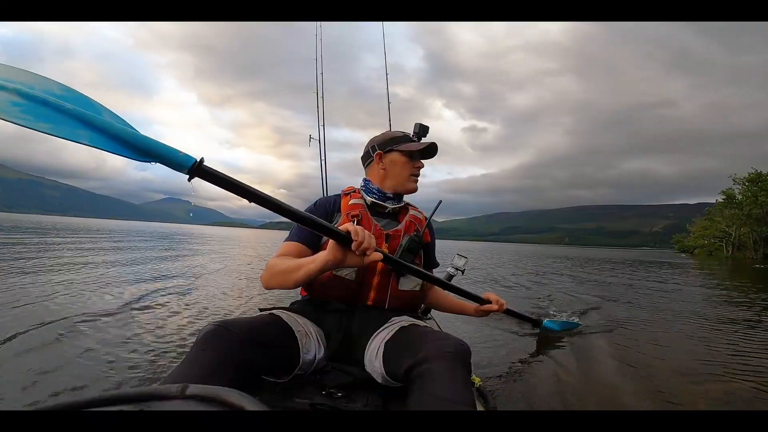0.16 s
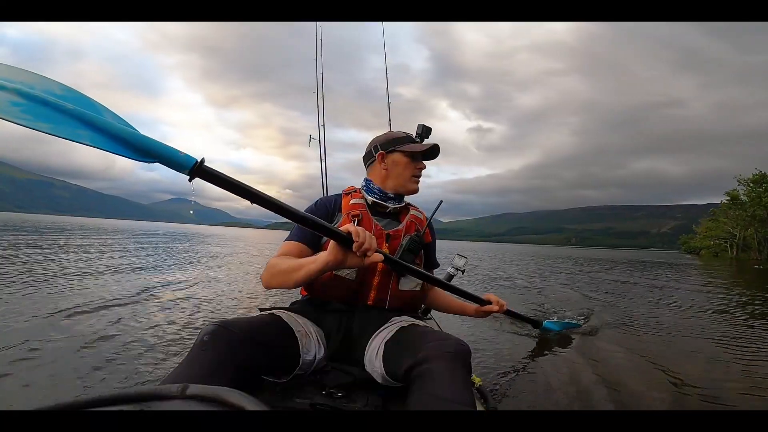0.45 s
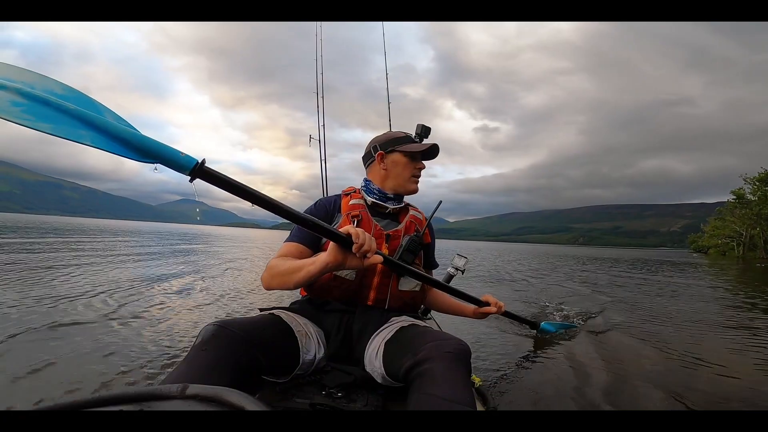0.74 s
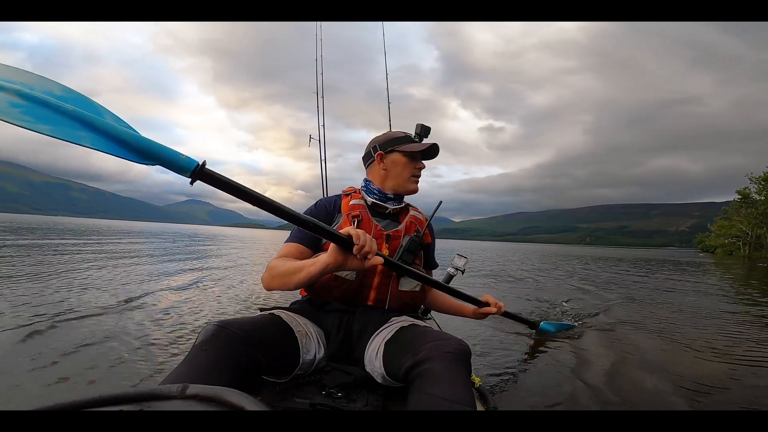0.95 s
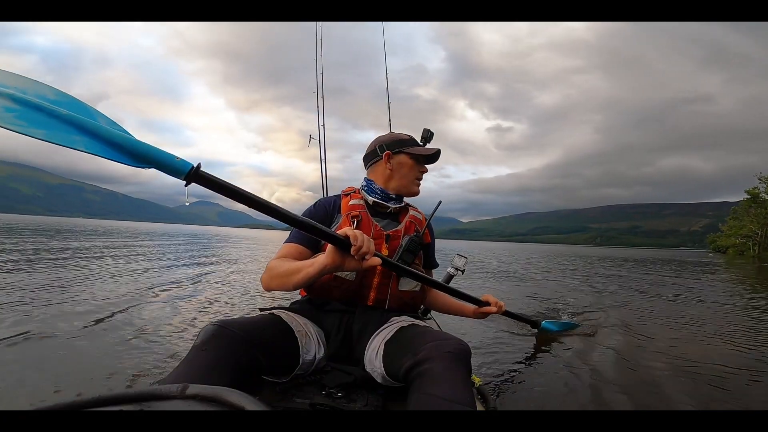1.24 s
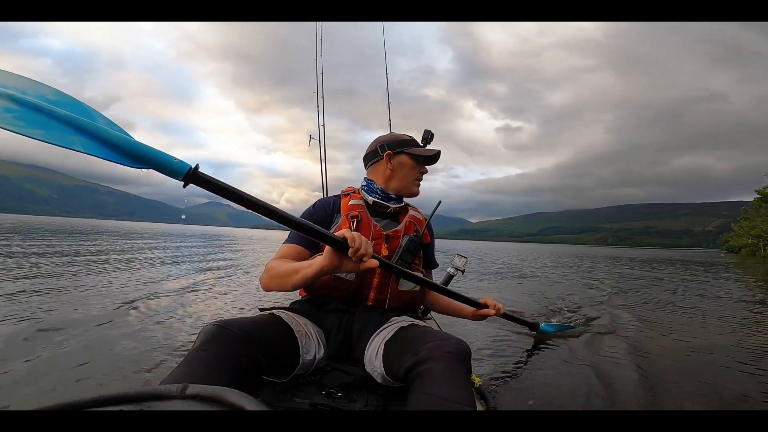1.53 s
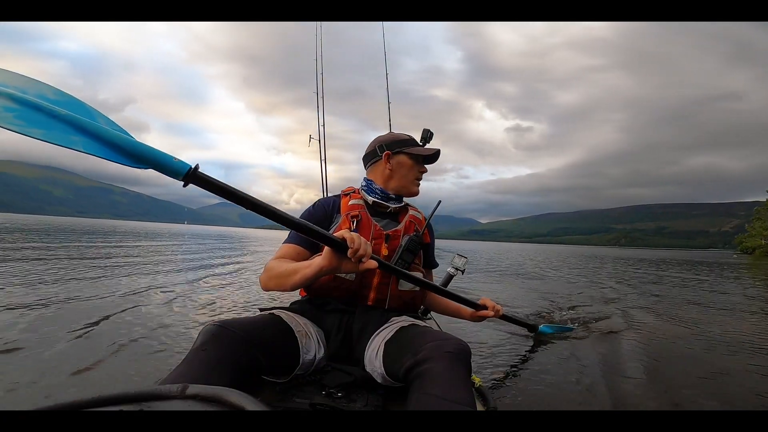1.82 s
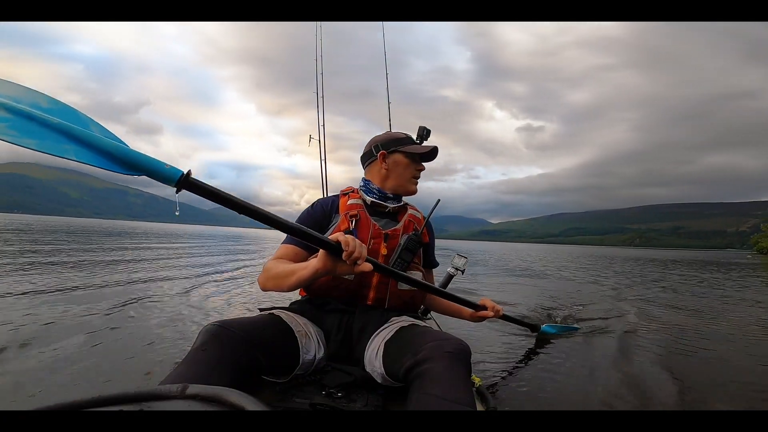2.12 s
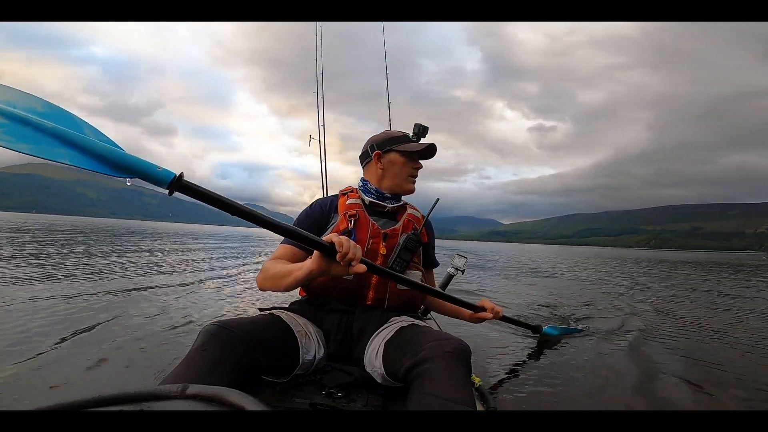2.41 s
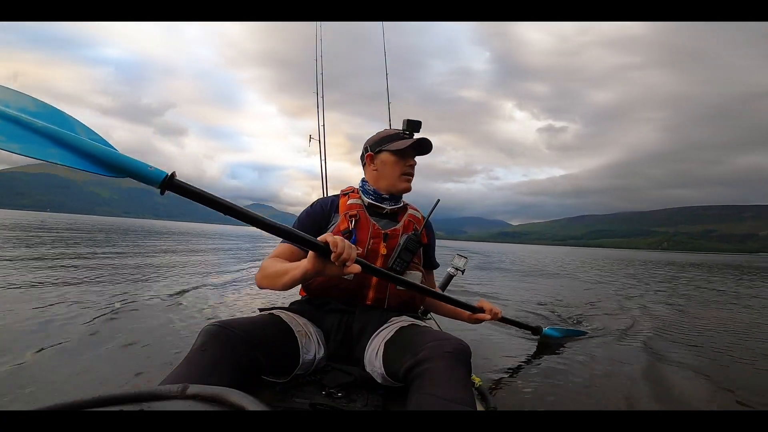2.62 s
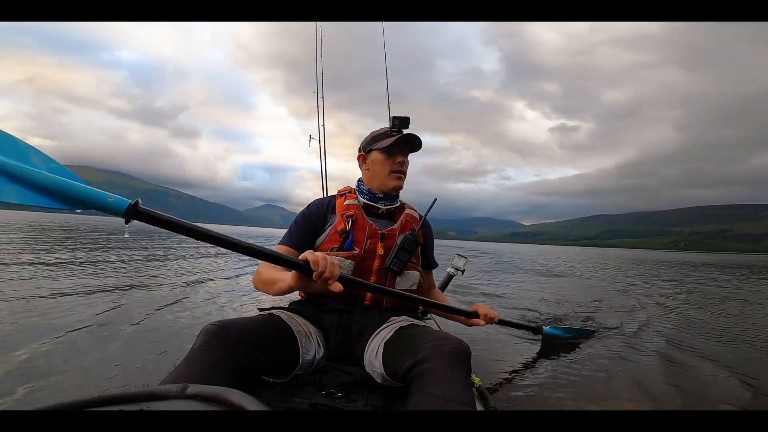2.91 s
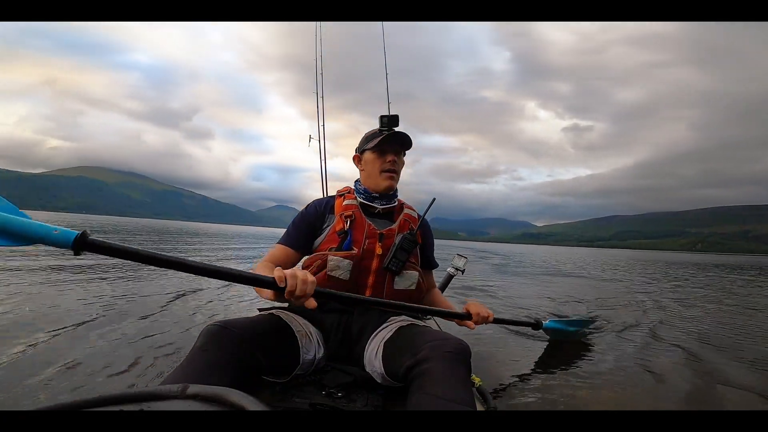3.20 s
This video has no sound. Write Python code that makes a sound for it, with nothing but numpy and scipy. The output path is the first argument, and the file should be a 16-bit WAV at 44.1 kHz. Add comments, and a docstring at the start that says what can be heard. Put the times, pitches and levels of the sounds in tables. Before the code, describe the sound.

Water gurgles, trickles and splashes softly around a paddle blade dragging beside a kayak for the first two seconds. Wind buffets the microphone from about 0.6 seconds, with low thuds strongest near 0.8 to 0.9 seconds. A clear plop comes at 1.9 seconds. Then the wind eases and the water thins to quiet single drips until about 3.3 seconds, with very faint lapping behind.

```python
"""A paddle blade drags beside a kayak drifting on a lake.
Water gurgles and splashes round the blade and slows to single drips: noise bands for wash and spray,
rising, dying sines for bubbles, a few low cycles for plops.
Gusts buffet the microphone with a thud, a flutter and one low bump; faint lapping lies far behind."""
import sys
import numpy as np
from scipy import signal
from scipy.io import wavfile

SR = 44100
rng = np.random.default_rng(int(sys.argv[2]) if len(sys.argv) > 2 else 0)


def to_wav(s):
    """Save 16-bit WAV."""
    ch = np.atleast_2d(s).T  # columns
    pcm = np.round(np.clip(ch, -1, 1) * 32767)  # PCM
    wavfile.write(sys.argv[1], SR, pcm.astype(np.int16))


N = 147735

# churn round the blade: (time [s], wash level [dB], spray level [dB])
CHURN = [(0.0, -48.5, -71.5), (0.21, -50, -63.5), (0.29, -43.5, -63.5), (0.47, -56.5, -70.5),
         (0.66, -50, -67), (0.82, -45, -65.5), (1.07, -53, -67.5), (1.39, -56, -74), (1.6, -51.5, -67.5),
         (1.74, -55.5, -63.5), (1.83, -51, -70.5), (1.95, -53, -73.5), (2.02, -59.5, -72),
         (2.23, -58.5, -76), (2.35, -71.5, -73.5), (2.51, -63, -81.5), (2.64, -78, -77),
         (2.84, -69.5, -84.5), (3.11, -72, -82), (3.35, -63, -76.5)]


def amp(db):
    return 10 ** (np.asarray(db) / 20)


def unit_rms(x):
    return x / np.sqrt(np.mean(x ** 2) + 1e-20)


def envelopes(rows):
    """Per-sample curve of each column after the time."""
    time_s, *columns = np.transpose(rows)
    return [np.interp(np.arange(N) / SR, time_s, c) for c in columns]


def level_at(spectrum, hz):
    freq_hz, db = np.transpose(spectrum)
    return np.interp(np.log(hz), np.log(freq_hz), db)


def bandpass(x, low_hz, high_hz):
    return signal.sosfilt(signal.butter(2, [low_hz, high_hz], "band", fs=SR, output="sos"), x)


def drift(rate_hz):
    """Slow random wander, rms about 1."""
    hop = 40
    pole = np.exp(-2 * np.pi * rate_hz * hop / SR)
    slow = signal.lfilter([1], [1, -2 * pole, pole ** 2], rng.standard_normal(N // hop + 2002))[2000:]
    return np.interp(np.arange(N) / hop, np.arange(len(slow)), unit_rms(slow))


def flicker_noise(spectrum, depth_db, rate_hz, shared):
    """Half-octave noise bands, each with its own flicker plus a shared one; rms 1."""
    out, common = 0, drift(rate_hz)
    octaves = np.log2(spectrum[-1][0] / spectrum[0][0])
    edges_hz = spectrum[0][0] * 2 ** np.arange(0, octaves + .01, .5)
    white = rng.standard_normal((2, N + SR // 4))
    for k, (low, high) in enumerate(zip(edges_hz, edges_hz[1:])):
        band = bandpass(white[k % 2], low, high)[-N:]
        flicker_db = depth_db * (shared * common + drift(rate_hz))
        out = out + band * amp(level_at(spectrum, np.sqrt(low * high)) + flicker_db)
    return unit_rms(out)


def bubble_tone(hz, cycles, draw):
    """Ragged dying sine; the pitch climbs as the bubble nears the surface."""
    life_s = np.clip(cycles, 3, 70) / hz
    t = np.arange(int(life_s * SR)) / SR
    rough, wobble = (np.interp(t * hz / 4, np.arange(20), d) for d in (draw[:20], draw[20:]))
    glide = 1 + .1854 * np.sqrt(1000 / hz) * t / life_s + .059 * wobble
    tone = np.sin(2 * np.pi * hz * np.cumsum(glide) / SR)
    attack = 1 - np.exp(-t * hz / 1.14)
    decay = amp(-25.1 * (t / life_s) ** .57)
    return attack * decay * tone * (1 + .43 * min(cycles / 20, 1) * rough)


def bubble_slap(hz, draw, decay_s=.0015):
    """Opening noise burst, centred just above the bubble's pitch; peak 1."""
    t = np.arange(300) / SR
    a, b = (np.interp(.9 * hz * t, np.arange(150), d) for d in (draw[:150], draw[150:]))
    phase = 2 * np.pi * 1.15 * hz * t
    envelope = np.minimum(hz * t, 1) * np.exp(-t / decay_s) * np.hanning(600)[300:]
    slap = envelope * (a * np.sin(phase) + b * np.cos(phase))
    return slap / np.abs(slap).max()


def bubbles(rows):
    """One slap and ringing tone per row."""
    out = np.zeros(N + SR)
    for time_s, db, hz, cycles, slap_db in rows:
        draw = rng.standard_normal(340)
        tone, slap = bubble_tone(hz, cycles, draw[:40]), bubble_slap(hz, draw[40:])
        i = int(time_s * SR)
        out[i:i + len(tone)] += amp(db) * tone
        out[i:i + len(slap)] += amp(db + slap_db) * slap
    return out[:N]


def swarm(spectrum, per_s, low_hz, high_hz, cycles, spread_db, clump_db, slap_db):
    """Small bubbles born at random, in clumps; rms 1."""
    when, pitch, strength, ring, softness = rng.random((1500, 5))[:int(per_s * N / SR)].T
    births = np.cumsum(amp(clump_db * drift(9)))
    time_s = np.searchsorted(births / births[-1], when) / SR
    hz = low_hz * (high_hz / low_hz) ** pitch
    db = level_at(spectrum, hz) + 10 * np.log10(hz) - spread_db * np.log(strength + .012)
    return unit_rms(bubbles(zip(time_s, db, hz, cycles * (.5 + ring), slap_db - 15 * softness)))


def drips():
    """Distinct drips and bubbles ringing above the churn."""
    # (time [s], level [dB], pitch [Hz], life [cycles], slap re level [dB])
    events = [(0.034, -28, 1075, 13.6, -22), (0.238, -26, 1005, 29, -3), (0.255, -33, 924, 38, -19),
              (0.267, -29, 1700, 16, -7), (0.293, -28.5, 880, 16, -10), (0.327, -29, 1330, 14, -9),
              (0.385, -37.5, 970, 23, -13), (0.419, -36.5, 1720, 37, -1), (0.466, -37.5, 1050, 33, 2),
              (0.705, -33, 1210, 56, -6.5), (0.808, -35, 1007, 37, 0), (0.934, -30.5, 970, 41, -13),
              (1.108, -42, 1260, 32, -16), (1.127, -38, 1214, 30, -13), (1.228, -29, 1020, 25, -3.5),
              (1.352, -41, 748, 65, 4), (1.364, -33, 950, 37, -7), (1.571, -31.5, 1374, 23, -12),
              (1.629, -34, 1490, 29, -7), (1.659, -37.5, 890, 38, 0), (1.827, -34.5, 900, 17, 1.5),
              (1.834, -29, 1316, 25, -14), (1.844, -41, 743, 36, -1), (1.898, -38, 930, 39, -20),
              (1.912, -19.5, 1187, 23.6, -13), (1.9125, -27.5, 550, 7.3, -4), (1.92, -24, 1313, 21, -22),
              (1.979, -34, 717, 27.5, -30), (2.296, -41, 1040, 59, -16), (2.337, -38.5, 1105, 37, -2.5),
              (2.376, -41, 970, 43, -16), (2.54, -44.5, 1670, 38, -25), (2.607, -42.5, 953, 31, 1),
              (2.981, -43.5, 850, 47, -31), (2.997, -39, 1190, 13, -24), (3.052, -40, 1230, 26, -8),
              (2.3765, -42, 1440, 45, -11), (2.6085, -41.5, 1400, 45, -1), (2.9811, -37, 1500, 14, -37),
              (0.0074, -36.5, 2330, 32, -18), (0.0318, -45, 2660, 24, -32), (0.159, -39.5, 2140, 28, -4),
              (0.2703, -47, 2210, 42, -23), (0.3865, -41, 2570, 56, -12), (0.6998, -33, 1890, 28, -4),
              (0.7173, -32.5, 2520, 65, -2), (0.9213, -34, 2310, 28, 4.5), (1.1323, -36.5, 2300, 37, -11),
              (1.2695, -41, 2270, 63, -3), (1.3024, -38, 2260, 47, -6), (1.4082, -45, 2720, 41, -18),
              (1.712, -54, 2980, 16, -6), (1.732, -33, 2350, 23, -1), (2.103, -47.5, 1990, 32, -6),
              (2.2553, -45, 2330, 33, -0.5), (2.377, -33.5, 2280, 32, -18), (2.4613, -46.5, 2270, 43, -23),
              (2.584, -51.5, 2700, 43, 0), (3.2884, -50.5, 2460, 40, -12), (3.3174, -52.5, 2320, 24, -3),
              (0.2064, -42.5, 3270, 25, -5), (0.3461, -39, 2810, 17, -2), (0.411, -48, 2740, 75, -11),
              (0.4868, -39.5, 2650, 34, -1.5), (0.5387, -48, 2690, 33, -14), (0.7776, -29.5, 3550, 41, -12),
              (0.8445, -35.5, 3330, 24, -7.5), (0.8734, -43, 3890, 47, -5), (1.3274, -43.5, 3620, 47, -12),
              (1.5614, -40.5, 3540, 54, -5), (1.7509, -36.5, 3940, 28, -3), (1.8103, -43.5, 2920, 21, -5),
              (1.8233, -45.5, 2800, 26, 1), (2.0438, -40.5, 2880, 42, -4), (2.2174, -42, 3810, 32, -7),
              (2.6189, -50, 2940, 46, -1), (2.6858, -55, 4200, 41, -17), (3.052, -53, 4330, 43, -12),
              (0.0308, -42.5, 4550, 37, -2), (0.183, -43, 4970, 74, -8), (0.1935, -39.5, 5700, 43, -10),
              (0.2578, -44.5, 5100, 31, -12), (0.2967, -50, 4750, 30, -8), (0.604, -46.5, 4720, 26, -10),
              (0.6973, -41, 4500, 42, -2), (0.8325, -38.5, 5400, 43, -13.5), (0.9393, -29.5, 6200, 28, -15),
              (1.0166, -49.5, 6100, 39, -4), (1.6656, -39.5, 5900, 22, -3), (1.6861, -48.5, 7600, 16, 0),
              (0.2064, -58, 10600, 40, -1), (1.279, -55, 11300, 40, 5), (1.8312, -51, 9600, 30, 4),
              (2.0398, -51, 10000, 40, 4.5), (1.7355, -39, 5400, 37, -19), (1.8766, -43.5, 4830, 20, -10),
              (1.933, -44, 4500, 19, -18), (2.3052, -54, 6240, 32, -1), (2.6419, -57, 5600, 66, 7.5),
              (3.1448, -55, 6060, 39, 0), (3.1594, -52, 5860, 64, -13), (3.2395, -54, 5670, 8.9, 5),
              (0.706, -34, 383, 35, -26), (2.294, -42, 746, 25, -12), (2.334, -43.5, 768, 41, -15)]
    return bubbles(events)


def wash():
    """Water rushing and gurgling round the blade."""
    # wash spectrum: (frequency [Hz], relative density [dB])
    spectrum = [(150, -6.5), (250, 1), (473, -10), (835, -6), (994, -3.5), (1380, -5), (1970, -10),
                (2730, -23.5), (3650, -48), (4000, -19), (5200, -91), (8800, -120)]
    rush = flicker_noise(spectrum, depth_db=2.9, rate_hz=14.5, shared=1)
    gurgle = swarm(spectrum, per_s=150, low_hz=450.6, high_hz=2940, cycles=20,
                   spread_db=2.9, clump_db=3, slap_db=-5)
    wash_db, _ = envelopes(CHURN)
    return amp(wash_db) * (amp(-3.5) * rush + amp(-1) * gurgle)


def spray():
    """Fine spray hissing, tiny bubbles fizzing."""
    # spray spectrum: (frequency [Hz], relative density [dB])
    spectrum = [(1180, -37), (2000, 1), (3020, -12), (3710, -9), (6240, -17), (10500, -20.5), (12400, -46),
                (16100, -73), (22000, -120)]
    hiss = flicker_noise(spectrum, depth_db=3.1, rate_hz=27, shared=1.2)
    fizz = swarm(spectrum, per_s=340, low_hz=2211, high_hz=7500, cycles=22,
                 spread_db=2.3, clump_db=5.5, slap_db=-3)
    _, spray_db = envelopes(CHURN)
    return amp(spray_db) * (amp(2.5) * hiss + amp(4.5) * fizz)


def sizzle(droplets_per_s=160, burst_s=.002, spread_db=3.5, hiss=.44):
    """Tiny droplets burst over a thin hiss in the top treble, following the spray level."""
    born = rng.random(N) < droplets_per_s * amp(4 * drift(12)) / SR
    sizes = amp(spread_db * np.minimum(rng.exponential(1, N), 4))
    pole = np.exp(-2 / (burst_s * SR))
    bursts = unit_rms(signal.lfilter([1], [1, -2 * pole, pole ** 2], born * sizes + 1e-18))
    treble = bandpass((bursts + hiss) * rng.standard_normal(N), low_hz=8600, high_hz=11650)
    _, spray_db = envelopes(CHURN)
    return amp(spray_db - 8) * unit_rms(treble)


def thumps():
    """Low thumps: a wind bump on the microphone, then water plops; a few cycles swell and fade."""
    # (centre time [s], peak [dB], pitch [Hz], length [cycles])
    events = [(0.891, -15.5, 116, 3.2), (1.909, -19.5, 208, 2.3), (2.572, -41, 151, 3.6)]
    out = np.zeros(N)
    for centre_s, db, hz, cycles in events:
        n = int(cycles / hz * SR)
        i = int(centre_s * SR) - n // 2
        t = (np.arange(n) - n / 2) / SR
        out[i:i + n] -= amp(db) * np.hanning(n) * np.cos(2 * np.pi * hz * t)
    return out


def wind():
    """Turbulence at the microphone: deep thud, lumpy flutter."""
    # (time [s], thud level [dB], flutter level [dB])
    gusts = [(0.0, -59, -41), (0.02, -43.5, -48.5), (0.12, -42, -49.5), (0.18, -33.5, -36), (0.3, -46, -42),
             (0.53, -34.5, -36), (0.64, -34.5, -45), (0.675, -24, -26.5), (0.75, -34, -39.5),
             (0.8, -15.5, -33), (0.85, -28.5, -29), (0.89, -24, -25.5), (0.92, -32, -30.5),
             (0.95, -25, -24.5), (1.04, -26.5, -29.5), (1.1, -36.5, -43.5), (1.22, -31.5, -43),
             (1.26, -23, -40), (1.39, -39, -40.5), (1.5, -36, -49), (1.535, -34, -35), (1.58, -32, -29),
             (1.64, -36.5, -42.5), (1.73, -28.5, -26.5), (1.83, -33.5, -37.5), (1.88, -29, -34.5),
             (1.91, -43, -33.5), (2.02, -38.5, -44.5), (2.05, -35, -47.5), (2.1, -40.5, -50),
             (2.36, -40.5, -48), (2.67, -41, -56.5), (2.73, -52, -58.5), (3.35, -51, -55.5)]
    # both: (frequency [Hz], relative density [dB])
    thud_spectrum = [(8.8, -39.5), (15, -2.5), (38, -2.5), (110, -12.5), (140, -42), (240, -120)]
    flutter_spectrum = [(41, -24), (70, -6), (167, 1), (242, -13), (287, -14.5), (600, -38.5), (780, -75.5),
                        (1320, -120)]
    thud = flicker_noise(thud_spectrum, depth_db=1.8, rate_hz=10, shared=.95)
    flutter = flicker_noise(flutter_spectrum, depth_db=2.2, rate_hz=14, shared=.79)
    thud_db, flutter_db = envelopes(gusts)
    return amp(thud_db) * thud + amp(flutter_db) * flutter


def lake():
    """Steady far lapping."""
    # lapping spectrum: (frequency [Hz], relative density [dB])
    spectrum = [(150, -16), (250, 0.5), (481, -2), (735, 0.5), (1020, -0.5), (1560, -50), (3960, -29),
                (6360, -23.5), (12400, -39), (16100, -92.5), (22000, -120)]
    return amp(-62) * flicker_noise(spectrum, depth_db=.75, rate_hz=17, shared=.37)


def scene():
    return (wind() + wash() + spray() + lake() + drips() + thumps() + sizzle())[None]


def record(dry):
    """The microphone dulls the treble; a steep low-pass cuts the top."""
    rolloff_hz, stopband_hz = 7060, 13450
    dull = signal.sosfilt(signal.butter(2, rolloff_hz, fs=SR, output="sos"), dry)
    return signal.sosfilt(signal.cheby2(18, 60, stopband_hz, fs=SR, output="sos"), dull)


dry = scene()
out = record(dry)
to_wav(out)
```